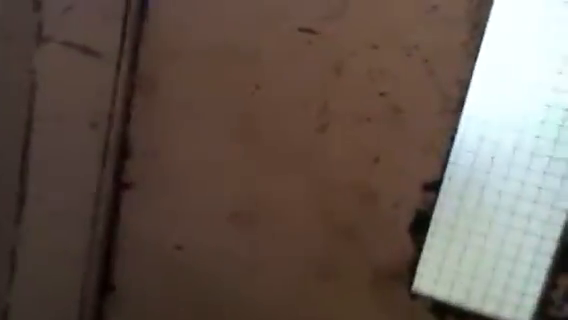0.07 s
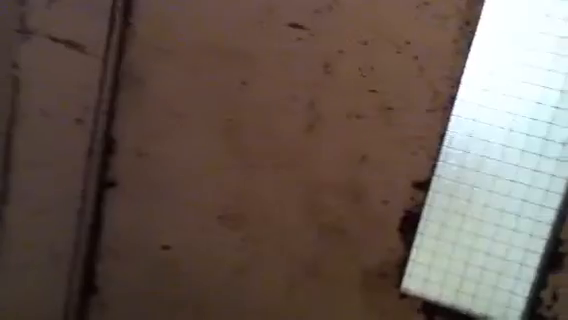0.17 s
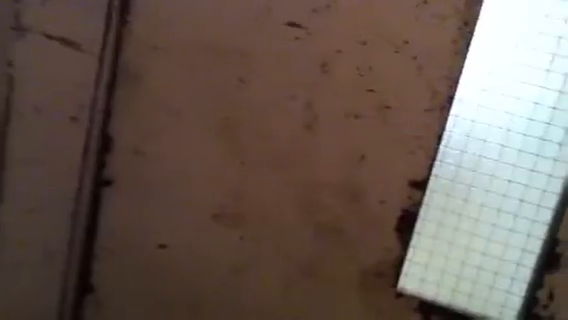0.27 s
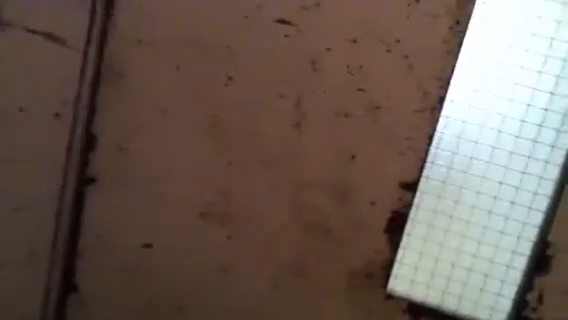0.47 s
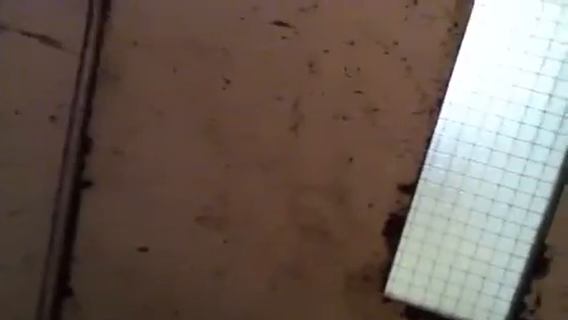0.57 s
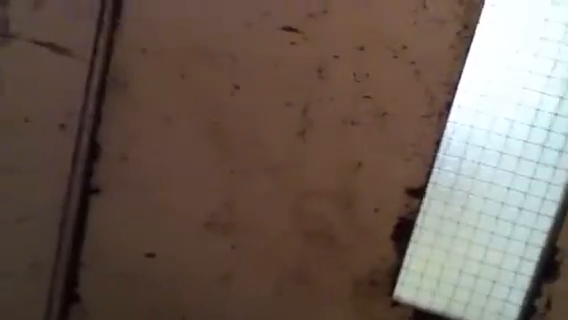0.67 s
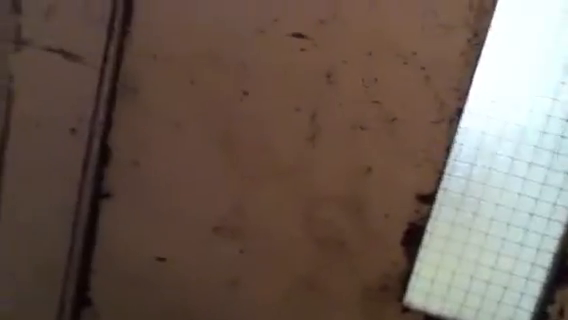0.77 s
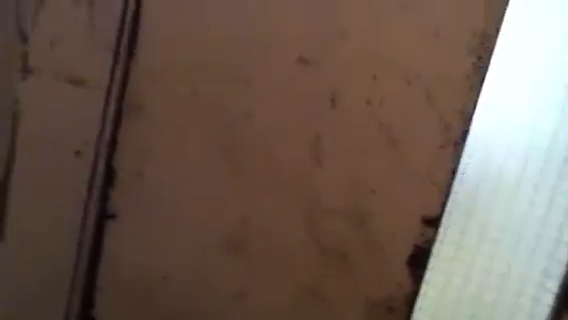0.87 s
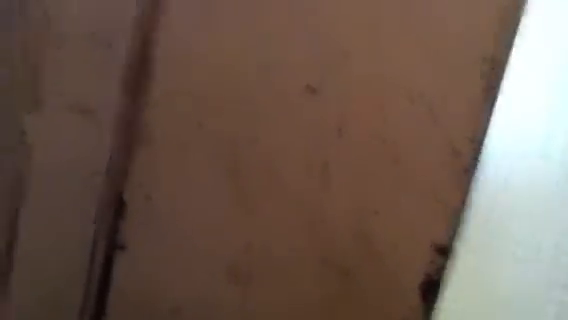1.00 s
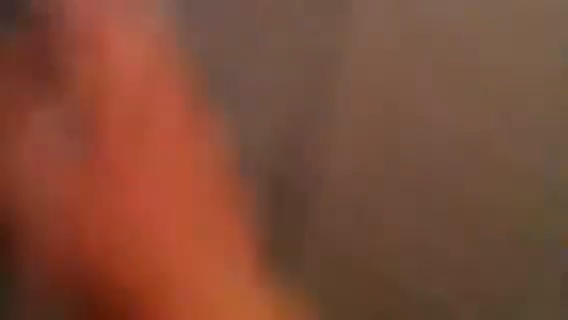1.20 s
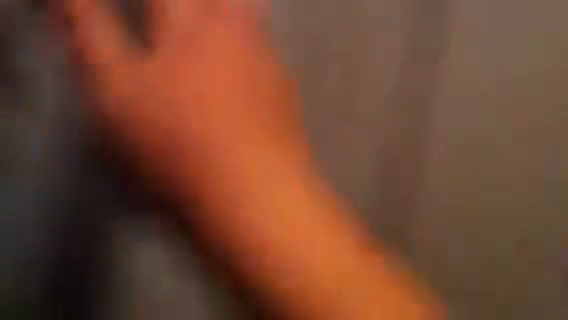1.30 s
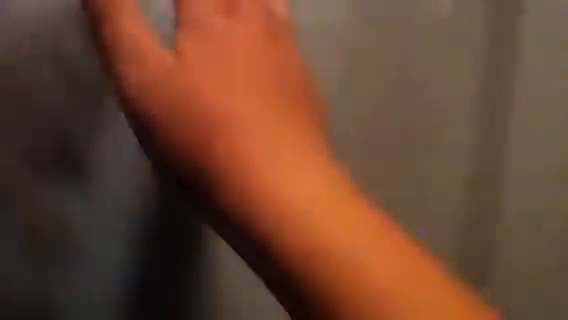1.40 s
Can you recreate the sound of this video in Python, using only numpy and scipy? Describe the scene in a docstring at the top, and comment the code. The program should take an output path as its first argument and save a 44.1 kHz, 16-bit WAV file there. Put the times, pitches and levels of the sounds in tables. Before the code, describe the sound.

An old elevator jolts with a deep thump at about 0.2 seconds, its cab panels ringing. A metal latch clunks and rattles at 0.3, followed near 0.5 by a faint rub and a brief high metallic note. A softer thump comes around 0.7, and the shaft's rumble dies away. A thin hiss and low machinery hum run underneath, two of its tones swelling from about 1 second.

```python
"""An old elevator jolts with a deep thump: the cab heaves and its panels ring.
Just after, a metal latch clunks and rattles, followed by a faint rub and a brief high metallic note.
A second, softer thump follows while the shaft rumbles on and dies away.
Under it all run a thin hiss and the low hum of the machinery, two of whose tones swell near the end."""
import sys
import numpy as np
from scipy import signal
from scipy.fft import irfft
from scipy.io import wavfile

SR = 44100
rng = np.random.default_rng(int(sys.argv[2]) if len(sys.argv) > 2 else 0)


def store_wav(level_fs):
    """Save 16-bit WAV to argv[1]."""
    pcm = np.round(np.clip(np.atleast_2d(level_fs), -1, 1) * 32767)
    wavfile.write(sys.argv[1], SR, pcm.T.astype(np.int16))


N = 63945
T = np.arange(N) / SR
HZ = np.fft.rfftfreq(N, 1 / SR)

# The tone colour of the hiss. Each row: frequency in Hz, relative level in dB.
HISS_COLOUR = [(100, -3.5), (2000, 0.5), (4000, -1), (8000, -1.5), (11000, -3.5), (15500, -7.5)]
# The tone colour of the machinery's drone. Each row: frequency in Hz, relative level in dB.
DRONE_COLOUR = [(15, -12), (45, 4.5), (70, -8.5), (100, -5.5), (135, -23), (175, -9), (250, -16),
                (310, -19), (570, -20.5), (720, -26.5), (1000, -31), (1350, -37), (1850, -35), (3000, -47),
                (6000, -56.5)]
# How the drone swells and sinks. Each row: time in seconds, level in dB.
DRONE_LOUDNESS = [(0, -44.5), (.15, -41), (.3, -38.5), (.8, -46.5), (1.1, -46.5), (1.3, -45.5),
                  (1.45, -48.5)]
# The tones the machinery hums. Each row: pitch in Hz, level in dB.
HUM_TONES = [(46, -55.5), (92, -60), (174, -62.5), (250, -65.5), (404, -69.5), (492, -69), (559, -69.5)]

# A brief high metallic note, then two tones of the machinery's hum.
# Each row: middle and half length in seconds, pitch in Hz, level in dB.
THIN_WHINES = [(.535, .075, 1800, -60), (.99, .045, 492, -54), (1.13, .17, 560, -60)]
# The noise bands of rubbing metal. Each row: centre in Hz, width in Hz, relative level in dB.
RUB_BANDS = [(470, 110, 4), (1140, 260, -32), (1580, 140, -13.5), (1850, 180, -18), (2440, 67, -26)]

# The strikes of the latch, led by a click as the first thump lands on the cab. Each row: start in seconds,
# relative level in dB, level of the opening crack in dB compared with the clatter.
LATCH_STRIKES = [(.2305, -15, -6), (.2717, -16, -10), (.2882, 3, -1), (.2972, 0, -3), (.3005, -2, -6),
                 (.3177, -2, 2), (.3245, -3, -3), (.335, -12, -6), (.36, -17, -6)]
# The notes the latch rings with. Each row: pitch in Hz, relative level in dB, fade time in seconds.
# A fade time is how long a sound takes to drop by 60 dB.
LATCH_NOTES = [(722, 5.5, 0.27), (825, -2, 0.3), (1110.7, 6.5, 0.095), (1777, -0.5, 0.37), (1874, 3, 0.32),
               (1992, -1, 0.34), (2051, -2, 0.32), (2290, 5, 0.12), (2510, -4, 0.17), (3160, -8, .13)]
# The tone colour of the latch's clatter. Each row: frequency in Hz, relative level in dB.
CLATTER_COLOUR = [(300, -24), (700, -23), (1150, 3.5), (1400, -5), (1900, 2), (2900, 1), (3700, -18),
                  (5500, -16.5), (8000, -48), (15000, -50)]
# How the clatter dies away. Each row: frequency in Hz, fade time in seconds.
CLATTER_FADE = [(700, 0.38), (1800, 0.27), (3000, 0.12), (6000, 0.074)]

# The blows on the cab. Each row: start in seconds, relative levels of the panel ring and
# of the shaft rumble in dB, contact time in seconds.
CAB_BLOWS = [(.2303, 0, 0, .0006), (.2877, 3, -6, .0006), (.6563, -8, -10, .003)]
# The notes of the cab panels. Each row: pitch in Hz, relative level in dB, rise and fade times in seconds.
PANEL_NOTES = [(75.9, -37, .018, .8), (93.6, -25, .19, 1.1), (97.7, -34, .065, 1), (153.3, -21, .045, .25),
               (162.7, -26, .07, .72), (170.3, -13, .25, .54), (173.2, -17, .018, .34),
               (191.9, -24, .026, .17), (215.3, -35, .024, 1.1), (250.2, -33, .056, .5),
               (408, -43, .003, .4), (441, -45, .004, .6), (563, -48, .004, .8), (627, -51, .005, .8)]
# The tone colour of the shaft's rumble. Each row: frequency in Hz, relative level in dB.
RUMBLE_COLOUR = [(20, -3.5), (40, 5.5), (65, -7), (100, 6), (130, -9.5), (175, 0.5), (225, 4.5),
                 (300, -9.5), (430, -1), (600, -11), (720, -23.5), (1200, -24), (2600, -31.5),
                 (4000, -35.5), (9000, -59)]
# How the rumble dies away. Each row: frequency in Hz, fade time in seconds.
RUMBLE_FADE = [(40, 3.1), (100, 2.58), (170, 1.25), (260, 0.56), (450, .65), (1000, 1.27), (2500, 0.6),
               (6000, 0.15)]
# The heaves of the cab. Each row: start in seconds, level in dB before swell and fade, pitch in Hz,
# then swell time, wait before fading and fade time, all in seconds.
CAB_HEAVES = [(0.229, -10, 39.3, 0.0097, .062, .16), (0.364, -29, 35.8, 0.0072, 0.042, 0.45),
              (0.4845, -32.5, 42.6, 0.0073, 0.042, 0.047), (0.646, -11, 40.74, 0.11, 0.061, 0.1),
              (0.7724, -32, 45.1, 0.018, 0.17, 0.062)]


def gain(db):
    """Turns decibels into a number to multiply a sound by."""
    return 10 ** (np.asarray(db) / 20)


def unit_level(sound):
    """Scales a sound so that its average level (rms) is 1."""
    return sound / np.sqrt(np.mean(sound ** 2) + 1e-20)


def look_up(table, hz):
    """Reads between the rows of a table, with frequencies spaced by octaves."""
    row_hz, values = np.transpose(table)
    return np.interp(np.log(hz + 1), np.log(row_hz + 1), values)


def add(mix, start, sound):
    """Mixes a sound in at a start time in seconds."""
    part = mix[max(round(start * SR), 0):]
    part += sound[:len(part)]


def noise(gains):
    """Noise of level 1, shaped by one gain for each frequency."""
    phases = np.exp(2j * np.pi * rng.random(len(HZ)))
    return unit_level(irfft(gains * phases, N))


def coloured_noise(colour):
    """Noise of level 1, shaped by a tone colour table."""
    return noise(gain(look_up(colour, HZ)))


def fading_noise(colour, fade_times):
    """A dense ring of noise in which every band dies at its own speed."""
    hz, t, bands = signal.stft(coloured_noise(colour), SR, nperseg=512)
    fade = gain(-60 * t / look_up(fade_times, hz)[:, None])
    return signal.istft(bands * fade, SR, nperseg=512)[1][:N]


def bump(middle, half_length):
    """A smooth rise and fall in loudness, timed in seconds."""
    return np.exp(-((T - middle) / half_length) ** 2)


def soften(sound, contact_s):
    """A longer contact takes the treble out of a blow."""
    smoothing = np.exp(-2 * np.pi / (contact_s * SR))
    return signal.lfilter([1 - smoothing], [1, -smoothing], sound)


def hiss(level_db=-61.5):
    """A thin, steady hiss."""
    return gain(level_db) * coloured_noise(HISS_COLOUR)


def machinery(waver_depth=0.97, waver_hz=3.2):
    """The machinery drones low, with humming tones that waver in loudness."""
    loudness_db = np.interp(T, *np.transpose(DRONE_LOUDNESS))
    out = gain(loudness_db) * coloured_noise(DRONE_COLOUR)
    for hz, db in HUM_TONES:
        waver = 1 + waver_depth * noise(np.exp(-(HZ / waver_hz) ** 2))
        tone = np.sin(2 * np.pi * (hz * T + rng.random()))
        out += gain(db) * unit_level(waver * tone)
    return out


def thin_whines():
    """A brief high metallic note, then two machinery hum tones, each swelling and fading."""
    return sum(gain(db) * np.sin(2 * np.pi * hz * T) * bump(middle, half_length)
               for middle, half_length, hz, db in THIN_WHINES)


def metal_rub(level_db=-50):
    """Sliding metal rubs faintly after the clunk."""
    scrape = sum(gain(db) * noise(1 / (1 + (2 * (HZ - hz) / width) ** 2)) for hz, width, db in RUB_BANDS)
    return gain(level_db) * unit_level(scrape) * bump(middle=0.51, half_length=0.11)


def latch(ring_db=-54.5, clatter_db=-46, crack_s=0.0018, attack_s=0.0003):
    """The first thump clicks as it lands, then the latch strikes and bounces: a crack, a dense clatter and a
    few ringing notes each time."""
    out = np.zeros(N)
    attack = np.minimum(T / attack_s, 1)
    for start, strike_db, crack_db in LATCH_STRIKES:
        ring = sum(gain(db - 60 * T / fade_s) * np.sin(2 * np.pi * (hz * T + rng.random()))
                   for hz, db, fade_s in LATCH_NOTES)
        crack = 1 + gain(crack_db) * np.exp(-T / crack_s)  # briefly lifts the start of the clatter
        clatter = fading_noise(CLATTER_COLOUR, CLATTER_FADE) * crack
        strike = gain(ring_db) * ring + gain(clatter_db) * clatter
        add(out, start, gain(strike_db) * strike * attack)
    return out


def cab_blows(rumble_base_db=-29, rumble_rise_s=0.00075):
    """Each blow rings the cab panels and leaves a rumble in the shaft."""
    ring = np.zeros(N)
    for hz, db, rise_s, fade_s in PANEL_NOTES:
        rise = 1 - np.exp(-T / rise_s)
        ring += gain(db - 60 * T / fade_s) * rise * np.sin(2 * np.pi * hz * T)
    out = np.zeros(N)
    for start, ring_db, rumble_db, contact_s in CAB_BLOWS:
        rumble = fading_noise(RUMBLE_COLOUR, RUMBLE_FADE) * (1 - np.exp(-T / rumble_rise_s))
        blow = gain(ring_db) * ring + gain(rumble_base_db + rumble_db) * rumble
        add(out, start, soften(blow, contact_s))
    return out


def cab_heaves():
    """The deep thumps: the whole cab swings back and forth a few times, then settles."""
    out = np.zeros(N)
    for start, db, hz, swell_s, wait_s, fade_s in CAB_HEAVES:
        swell = np.minimum(T / swell_s, 1)
        drop_db = 60 * np.maximum(T - wait_s, 0) / fade_s
        add(out, start, swell * gain(db - drop_db) * np.sin(2 * np.pi * hz * T))
    return out


def scene():
    """Cab, latch, rub and whines over the machinery and the hiss, in one channel."""
    return (cab_heaves() + cab_blows() + latch() + metal_rub() + thin_whines() + machinery() + hiss())[None]


def record(dry):
    """Cuts away the very highest treble."""
    cutoff_hz = 15800
    treble_cut = signal.firwin(511, cutoff_hz, window=("kaiser", 9), fs=SR)
    return signal.oaconvolve(dry, treble_cut[None], "same")


dry = scene()
out = record(dry)
store_wav(out)
```